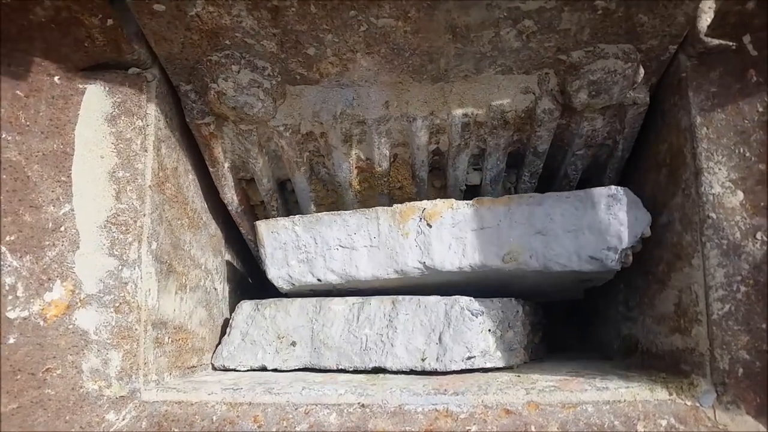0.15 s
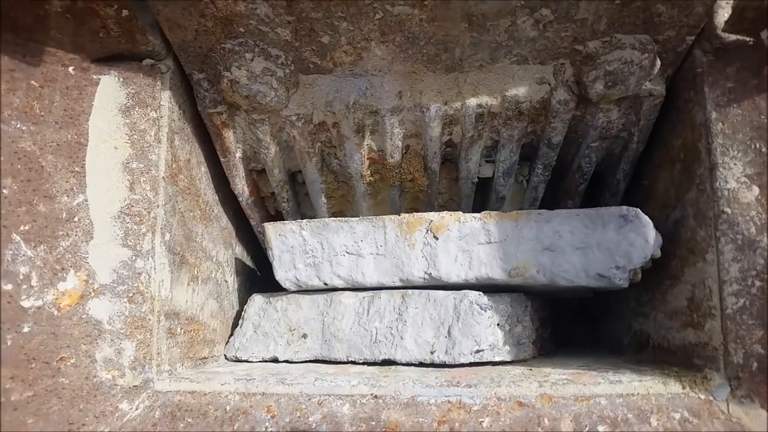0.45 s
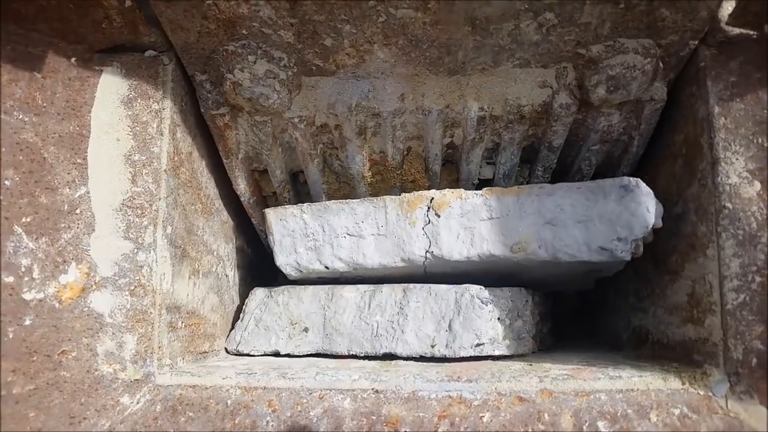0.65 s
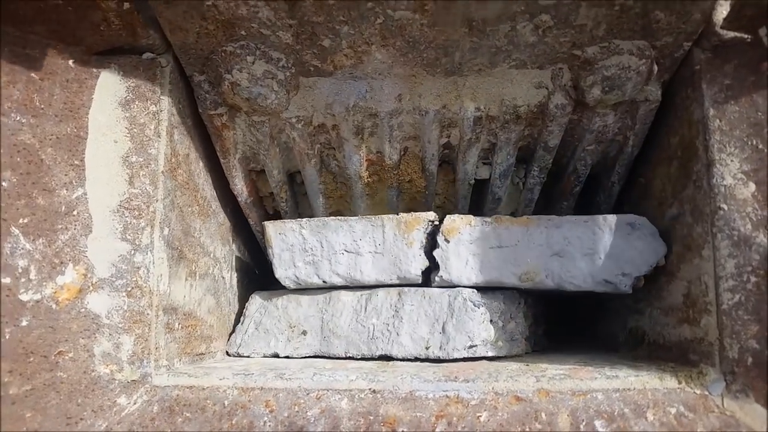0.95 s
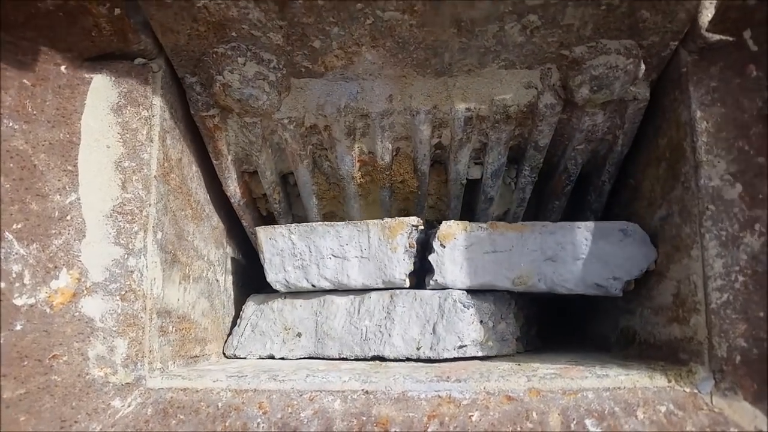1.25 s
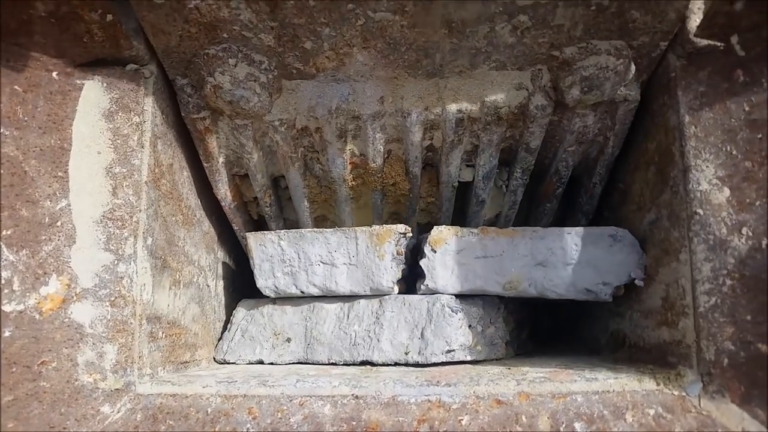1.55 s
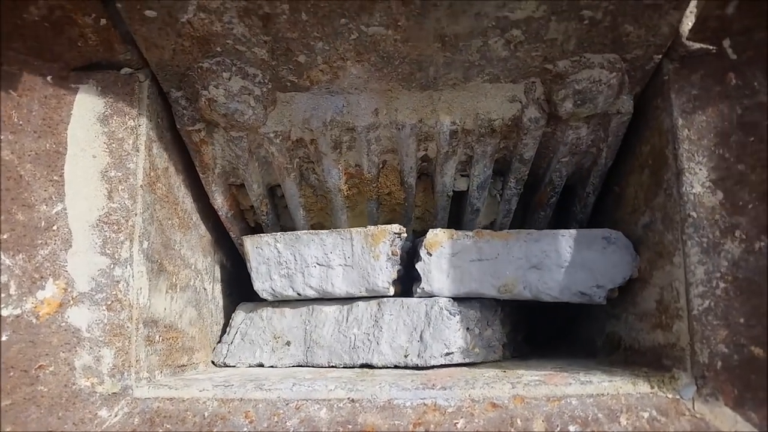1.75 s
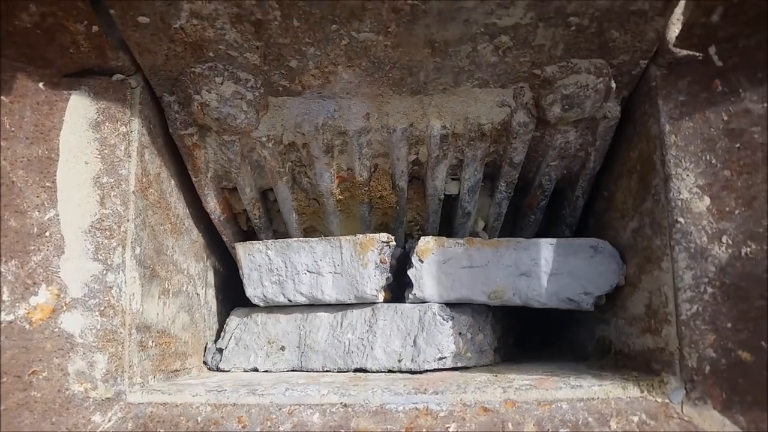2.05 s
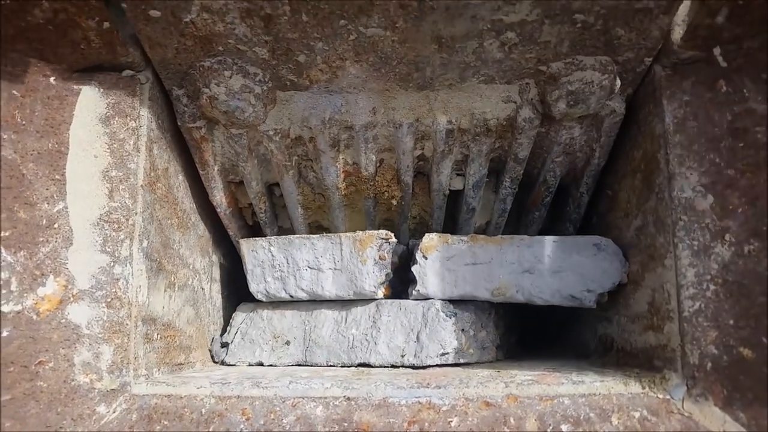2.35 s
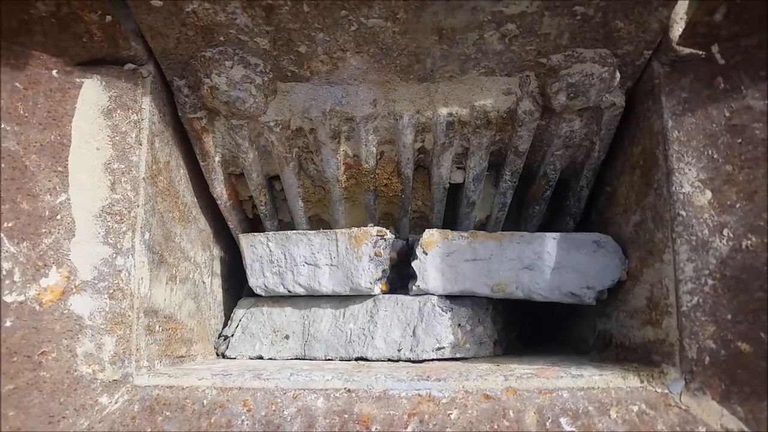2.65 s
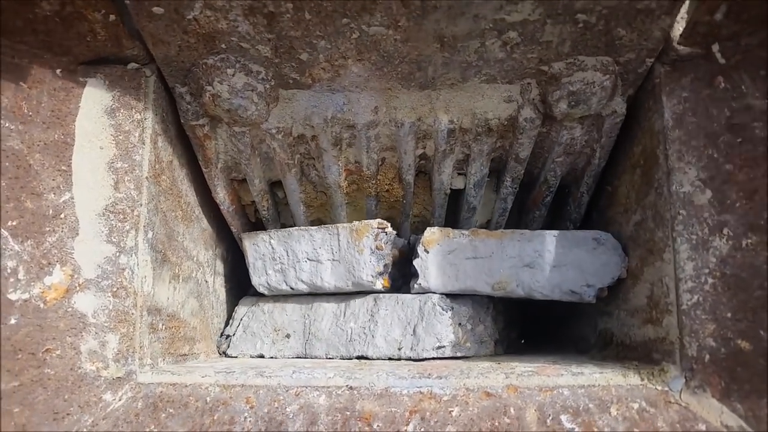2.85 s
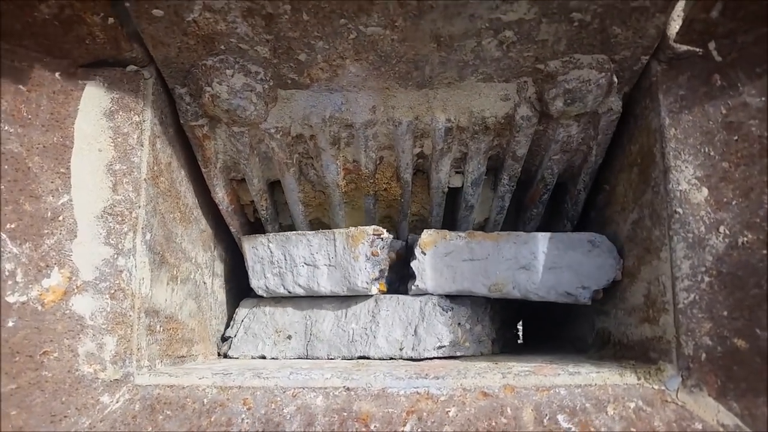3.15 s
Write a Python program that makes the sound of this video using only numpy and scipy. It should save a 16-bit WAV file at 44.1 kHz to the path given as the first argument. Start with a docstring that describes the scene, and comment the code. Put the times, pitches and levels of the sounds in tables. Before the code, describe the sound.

A jaw crusher crunches and cracks concrete slabs over a chugging diesel engine.

```python
"""Concrete crunches and cracks over a chugging engine: a jaw crusher, heard just above its steel hopper.
The jaw squeezes two slabs about 3.6 times a second, grinding off grit and making its steel plates ring.
Now and then the concrete cracks, flicks off a splinter or thuds on the steel.
A slow single-cylinder diesel drives it: each cycle gulps air, knocks, thumps out exhaust and clatters.
Belts and flywheel rumble underneath, and the treble echoes between the hopper walls."""
import sys
import numpy as np
from scipy import signal
from scipy.fft import rfft, irfft, next_fast_len
from scipy.io import wavfile

SR = 44100
rng = np.random.default_rng(int(sys.argv[2]) if len(sys.argv) > 2 else 0)


def dump(signal):
    """Clip the signal to [-1, 1] and save it as 16-bit WAV at the path in sys.argv[1]."""
    limited = np.clip(np.atleast_2d(signal).T, -1, 1)
    pcm = np.round(limited * 32767).astype(np.int16)
    wavfile.write(sys.argv[1], SR, pcm)


N = 145971
TIME, RING = np.arange(N) / SR, np.arange(SR // 5) / SR  # seconds: the whole scene, one short sound
MODE_SCATTER_DB = 1.5  # how much a ringing tone's level varies from hit to hit

# Cracks in the concrete: t/s, clack pitch f/Hz, snap level/dB, body level/dB
CRACK_EVENTS = [(.152, 3480, -18, -20), (.347, 1768, -22.5, -27), (.368, 887, -19, -7),
                (.415, 1332, -13.5, -9.5), (.4445, 2144, -12, -12), (.462, 3628, -15, -13),
                (.681, 3620, -14, -8), (1.197, 1520, -20.5, -14.5), (1.244, 2352, -17, -12.5),
                (1.829, 1990, -22, -14.5), (2.061, 2970, -13, -14), (2.102, 2645, -17, -12),
                (2.282, 2900, -13, -8.5), (2.318, 3600, -16.5, -10), (2.359, 1730, -24, -24),
                (2.402, 3050, -16, -26), (2.627, 1677, -21, -12.5), (2.654, 3657, -14.5, -16),
                (2.95, 4140, -19.5, -23), (3.198, 1630, -19, -15.5)]
# Tone colour of breaking grit: f/Hz, level/dB
GRIT_SPECTRUM = [(300, -32), (900, -17), (1400, 1.5), (2400, 1.5), (3700, -1.5), (5500, -4.5), (8500, -10),
                 (12500, -5.5), (16000, -1)]


def concrete():
    """Each squeeze of the jaw grinds out bright grit and a deeper crunch, and the slabs break."""
    # Squeezes: peak t/s, rise/s, fall/s, grit level/dB, body level/dB
    squeezes = [(.14, 0.036, 0.072, -28, -23.5), (.385, 0.022, .13, -29.5, -19),
                (0.704, .018, 0.038, -24, -18.5), (.985, 0.063, 0.039, -25.5, -21.5),
                (1.265, 0.061, 0.052, -22.5, -17.5), (1.535, 0.04, 0.059, -30, -25.5),
                (1.824, 0.062, 0.062, -29.5, -20.5), (2.127, 0.058, 0.059, -27.5, -24),
                (2.336, 0.045, 0.078, -27.5, -20), (2.412, .014, 0.014, -29.5, -44),
                (2.662, 0.046, 0.031, -25, -20), (2.897, 0.017, 0.02, -26, -17),
                (3.206, 0.046, 0.26, -31, -26.5)]
    # Tone colour of the deeper crunch, the slab's body: f/Hz, level/dB
    body_spectrum = [(100, -41), (250, -11), (360, 9), (450, -20), (540, -0.5), (700, 1), (800, -12.5),
                     (980, -5), (1300, -26.5), (2500, -11), (8000, -70)]
    grit_force = sum(amp(db) * swell(TIME - s, rise, fall) for s, rise, fall, db, _ in squeezes)
    body_force = sum(amp(db) * swell(TIME - s, rise, fall) for s, rise, fall, _, db in squeezes)
    stall_s, stall_depth = .01, .51  # the grinding sticks briefly before each crack
    stalls = [1 - stall_depth * np.exp(-((TIME - s) / stall_s + 1) ** 2) for s, *_ in CRACK_EVENTS]
    slip = np.prod(stalls, axis=0)
    grit = grains(GRIT_SPECTRUM, grit_force * slip, t60=.043, pitches=np.geomspace(900, 12000, 8))
    body = grains(body_spectrum, body_force * slip, t60=.073, pitches=np.geomspace(280, 1100, 8))
    return grit + body + crumbs(grit_force * slip) + cracks() + chips() + thuds() + plates(grit_force)


def grains(spectrum, force, t60, pitches):
    """Tiny fractures, louder under more force, at contact spots that each ring at their own pitch."""
    grains_per_s, scatter_db = 900, 6
    out = np.zeros((2, N))
    for hz in pitches:
        breaks = rng.random(N) < grains_per_s / len(pitches) / SR
        sizes = amp(scatter_db * np.clip(rng.standard_normal(N), -2, 2))
        clicks = unit(breaks * sizes) * force
        ring = burst(tinted(spectrum, hz), t60)
        out += signal.fftconvolve(clicks[None], ring / np.linalg.norm(ring), axes=1)[:, :N]
    return out / 2


def crumbs(force):
    """Coarse crumbs burst off one by one, each with its own short ring."""
    crumbs_per_s, middle_hz = 170, 2100
    out = np.zeros((2, N))
    for when, pitch, size in rng.random((int(crumbs_per_s * N / SR), 3)):
        hz = middle_hz * 2 ** (2 * pitch - 1)  # up to an octave either way
        add(out, when * N / SR, force[int(when * N)] * (size + .5) * clink(hz, t60=.037))
    return out * amp(-2)


def cracks():
    """A crack snaps, rings the broken piece and the slab, and runs on in two weaker jumps."""
    gap_s, jump_db = .0066, -4.5
    # Tone colour of the slab as it cracks: f/Hz, level/dB
    slab_spectrum = [(150, -6), (330, 4.5), (530, 13), (720, 2), (980, 5.5), (1300, -6.5), (8000, -30)]
    out = np.zeros((2, N))
    for s, hz, snap_db, body_db in CRACK_EVENTS:
        add(out, s, amp(snap_db - 12.5) * clink(hz, t60=.12))
        add(out, s, amp(body_db) * burst(slab_spectrum, t60=.05))
        delays = np.append(0, np.cumsum(gap_s * (.5 + rng.random(size=2))))
        for k, delay in enumerate(delays):
            add(out, s + delay, amp(snap_db + jump_db * k) * burst(tinted(GRIT_SPECTRUM, hz), t60=.035))
    return out


def chips():
    """Splinters flick against the steel with a bright tick."""
    # Flicks: t/s, level/dB
    flicks = [(2.063, -10.5), (2.178, -15), (2.317, -9.5)]
    tick_spectrum = [(2000, -20), (7000, -5), (14000, 7.5)]  # f/Hz, level/dB
    out = np.zeros((2, N))
    for s, db in flicks:
        add(out, s, amp(db) * burst(tick_spectrum, t60=.021))
    return out


def thuds():
    """A slab shifts and bumps the jaw, sounding one low tone."""
    # Bumps: t/s, f/Hz, level/dB
    bumps = [(.365, 499, -12.5), (.681, 632, -12), (.695, 373.7, -12.5), (1.266, 390, -16),
             (1.293, 355, -7.5), (2.282, 566, -14.5), (2.319, 520, -13), (2.402, 397, -12),
             (2.668, 306, -11)]
    out = np.zeros((2, N))
    for s, hz, db in bumps:
        add(out, s, amp(db) * mode(hz, t60=.11) * onset(rise_s=.0018))
    return out


def plates(force):
    """The grinding shakes the steel jaw plates, so they ring along."""
    # Tones of the plates: f/Hz, ring time/s, level/dB
    tones = [(705, 0.17, -3), (982, 0.14, -1), (2710, 0.073, -25), (3140, 0.13, -6), (3530, 0.15, -3.5),
             (4540, 0.11, -8.5)]
    steel = sum(amp(db) * mode(hz, t60) for hz, t60, db in tones)
    shaking = force * rng.standard_normal((2, N))
    return amp(-4.5) * signal.fftconvolve(shaking, steel[None] / np.linalg.norm(steel), axes=1)[:, :N]


def clink(hz, t60):
    """A broken piece rings with three tones around hz, differently for each piece and each side."""
    pitches = hz * np.array([.77, 1, 1.27]) * np.exp(.04 * rng.standard_normal(3))
    ring = np.zeros((2, len(RING)))
    for f in pitches:
        gain = amp(MODE_SCATTER_DB * rng.standard_normal((2, 1)))
        ring += gain * np.sin(2 * np.pi * (f * RING + rng.random((2, 1))))
    return ring * fade(t60)


def tinted(spectrum, hz):
    """Each piece of stone favours one pitch: lift the spectrum around hz."""
    lift_db, width_octaves = 5, .28
    grid = np.geomspace(100, 20000, 80)
    lift = lift_db * np.exp(-.5 * (np.log2(grid / hz) / width_octaves) ** 2)
    return np.column_stack([grid, along(spectrum, grid) + lift])


def engine(load):
    """Every diesel cycle repeats the same air puffs, metal blows and hisses, slightly varied."""
    cycle_s, first_s = .12568, -.1336
    puff_scatter_db, scatter_db, scatter_s = .5, .9, .0001
    # Two intake gulps, then three exhaust tones: t/s in the cycle, f/Hz, half length/s, level/dB
    puffs = [(0.0093, 103, 0.0027, -15), (0.02124, 114, 0.0031, -14.5), (.0488, 204.3, 0.0044, -10),
             (.046, 653, 0.005, -19), (0.043, 116.4, 0.0044, -18.5)]
    # Firing knock, piston slap, valve gear: t/s in the cycle, rise/s, clank level/dB
    blows = [(0.0364, 0.00044, -24.5), (0.0758, 0.00056, -64.5), (0.104, 0.00047, -24.5)]
    # Tones of the engine block: f/Hz, ring time/s, level/dB for each of the three blows
    block = [(193.5, 0.14, -30, -65, -30), (245.9, 0.12, -24.5, -14, -39.5), (312.7, 0.16, -16, -22.5, -30),
             (364.6, 0.16, -20.5, -34, -21), (492, 0.05, -24.5, -24, -33.5), (634, 0.048, -32, -76, -25),
             (704, 0.16, -30, -19.5, -49), (919, 0.084, -26, -45, -39), (1076, 0.096, -32.5, -48, -27.5),
             (1567, 0.064, -17.5, -60, -22.5), (1652, 0.087, -56, -25, -27),
             (2090, 0.043, -24.5, -27.5, -24.5)]
    # Tone colour of a clank: f/Hz, level/dB
    clank_spectrum = [(300, -50), (900, 40), (1300, -2), (2200, 17), (4000, 21), (6000, -41)]
    # Hisses: peak t/s in the cycle, rise/s, fall/s, level/dB
    hisses = [(.012, .0036, 0.0065, -20.5), (0.041, 0.0073, 0.016, -29.5), (.079, 0.0038, 0.0061, -33.5)]
    # Tone colour of the hiss: f/Hz, level/dB
    hiss_spectrum = [(200, -5.5), (700, 6.5), (2000, 1.5), (3600, 3.5), (6000, -2.5), (9000, -6.5),
                     (13000, -2), (16000, 1.5)]
    out, hiss_level = np.zeros((2, N)), np.zeros(N)
    clank_t60 = .022
    clanks = [burst(clank_spectrum, clank_t60) for _ in blows]
    tones = np.array([mode(hz, t60) for hz, t60, *_ in block])
    tone_levels = np.array(block)[:, 2:].T
    centred = RING - RING.mean()
    for start in np.arange(first_s, N / SR, cycle_s):
        for s, hz, width, db in puffs:
            puff = -np.exp(-.5 * (centred / width) ** 2) * np.cos(2 * np.pi * hz * centred)
            add(out, start + s - RING.mean(), amp(db + puff_scatter_db * rng.normal()) * puff)
        for (s, rise, db), tone_db, clank in zip(blows, tone_levels, clanks):
            ring = amp(tone_db + MODE_SCATTER_DB * rng.standard_normal(len(block))) @ tones
            fresh = amp(-3.5) * burst(clank_spectrum, clank_t60)  # the part that is new each cycle
            blow = (ring + amp(db) * (clank + fresh)) * onset(rise)
            add(out, start + s + scatter_s * rng.normal(), amp(scatter_db * rng.normal()) * blow)
        for s, rise, fall, db in hisses:
            add(hiss_level, start, amp(db + scatter_db * rng.normal()) * swell(RING - s, rise, fall))
    hiss = hiss_level * noise(hiss_spectrum, N)
    return load * out + load ** 1.5 * hiss  # the hiss grows fastest with load


def rumble():
    """Belts and flywheel make a steady low noise."""
    # Tone colour of the rumble: f/Hz, level/dB
    spectrum = [(32, -40), (60, -11), (100, 6.5), (140, -8), (280, 10.5), (450, -16), (700, -9.5),
                (1300, -14), (3500, -19), (6000, -33.5), (14000, -39)]
    return amp(-27.5) * noise(spectrum, N)


def hopper(x):
    """The treble bounces to and fro between the steel walls."""
    t = RING[:SR // 25]
    arrivals = (rng.random((2, len(t))) < .03) * (t > .002)
    echoes = arrivals * rng.standard_normal((2, len(t))) * fade(t60=.045)[:len(t)]
    echoes = signal.sosfilt(signal.butter(2, 2900, 'high', fs=SR, output='sos'), echoes)
    echoes /= np.linalg.norm(echoes, axis=1, keepdims=True)
    return x + amp(-10) * signal.fftconvolve(x, echoes, axes=1)[:, :N]


def burst(spectrum, t60):
    """A hit rings so many tones at once that it sounds like fading noise; its energy is always the same."""
    shape = fade(t60) * onset(rise_s=.0003)
    return unit(noise(spectrum, len(RING)) * shape) * np.sqrt(np.mean(shape ** 2))


def noise(spectrum, size):
    """Stereo noise with the given tone colour, partly alike on both sides in the bass."""
    # How alike left and right are: f/Hz, likeness (1 = the same)
    likeness = [(100, 0.53), (700, 0.46), (1400, 0.39), (4000, 0.015)]
    hz = np.fft.rfftfreq(size, 1 / SR)
    spread = np.arccos(along(likeness, hz)) / 2
    coloured = rfft(rng.standard_normal((2, size))) * amp(along(spectrum, hz))
    mid, side = irfft(coloured * [np.cos(spread), np.sin(spread)], size)
    return unit(np.array([mid + side, mid - side]))


def mode(hz, t60):
    """One ringing tone that dies away."""
    return np.sin(2 * np.pi * hz * RING) * fade(t60)


def fade(t60):
    """A fall of 60 dB in t60 seconds, the ring time."""
    return 1000 ** (-RING / t60)


def onset(rise_s):
    """A quick, smooth rise from silence."""
    return 1 - np.exp(-RING / rise_s)


def swell(t, rise, fall):
    """A bell-shaped rise to t = 0, then a fading tail."""
    return np.exp(np.where(t < 0, -.5 * (t / rise) ** 2, -np.abs(t) / fall))


def amp(db):
    """Decibels to gain."""
    return 10 ** (np.asarray(db) / 20)


def unit(x):
    """Scale to an average (rms) level of 1."""
    return x / np.sqrt(np.mean(x ** 2) + 1e-20)


def along(points, hz):
    """Read between (f/Hz, value) points on a pitch scale."""
    f, values = np.transpose(points)
    return np.interp(np.log(hz + 1), np.log(f + 1), values)


def add(out, s, x):
    """Mix x into out, starting at s seconds."""
    i = int(round(s * SR))
    a, b = max(i, 0), min(i + x.shape[-1], N)
    if b > a:
        out[..., a:b] += x[..., a - i:b - i]


def scene():
    """Engine and rumble with the crushing on top, all echoing in the hopper."""
    # The engine eases once the slab has split: t/s, level/dB
    easing = [(1.1, 2), (1.6, 0.4), (3.3, -1.16)]
    load = amp(np.interp(TIME, *np.transpose(easing)))
    return hopper(engine(load) + load * rumble() + concrete())


def record(dry):
    """Two microphones, unlike in tone, round off loud peaks and lose the deepest bass and highest treble."""
    left_lead_s, low_cut_hz, top_hz, ceiling = .00019, 32, 15950, .95
    # Balance: f/Hz, left minus right level/dB
    balance = [(100, -4), (160, -1.8), (550, 1.3), (1220, -.5), (2010, 2), (3330, 8), (5500, 9), (9080, 6),
               (15000, -3)]
    size = next_fast_len(N + SR // 5)
    hz, side = np.fft.rfftfreq(size, 1 / SR), np.array([[.5], [-.5]])
    colour = amp(side * along(balance, hz))
    colour /= np.sqrt(np.mean(colour ** 2, axis=0))
    time_shift = np.exp(2j * np.pi * hz * side * left_lead_s)
    low_cut = 1 - np.exp(-(hz / low_cut_hz) ** 2)
    heard = irfft(rfft(dry, size) * colour * time_shift * low_cut, size)
    rounded = heard / (1 + np.abs(heard / ceiling) ** 6) ** (1 / 6)
    return irfft(rfft(rounded) * (hz < top_hz), size)[:, :N]


dry = scene()
out = record(dry)
dump(out)
```